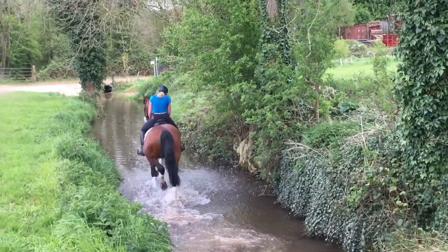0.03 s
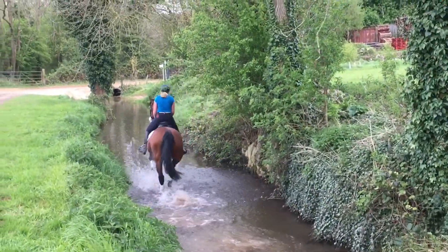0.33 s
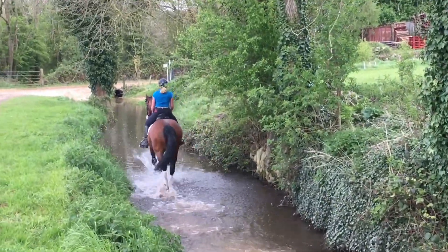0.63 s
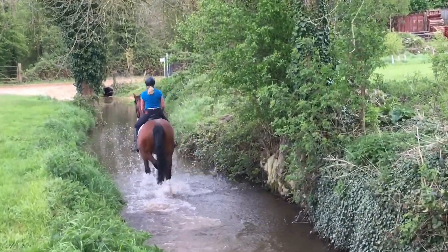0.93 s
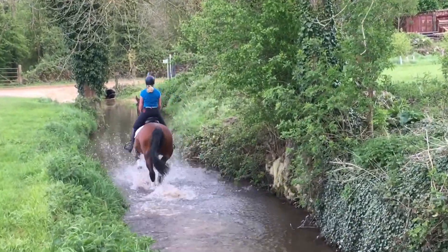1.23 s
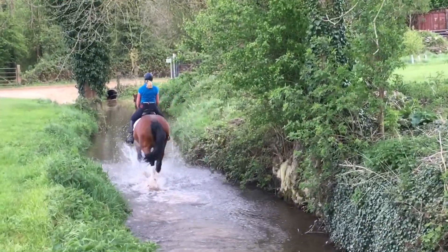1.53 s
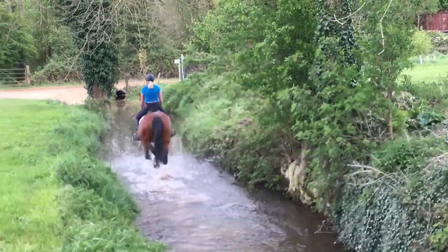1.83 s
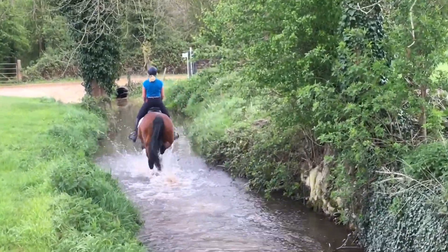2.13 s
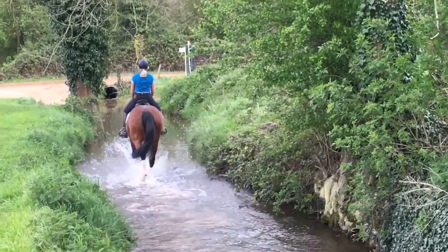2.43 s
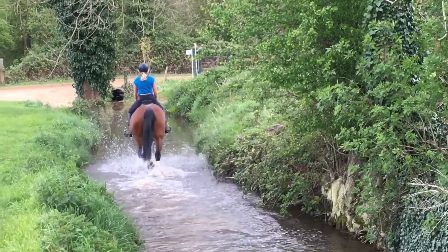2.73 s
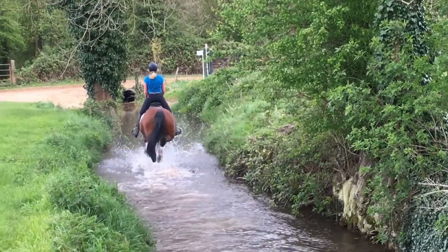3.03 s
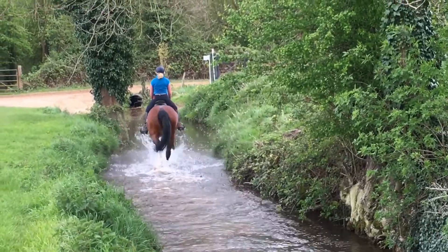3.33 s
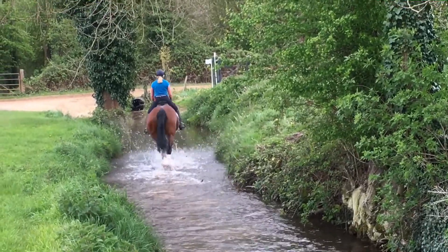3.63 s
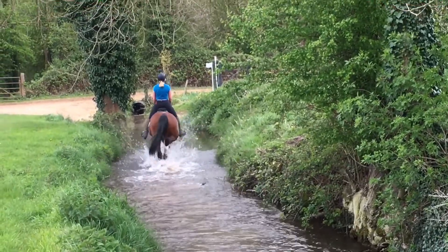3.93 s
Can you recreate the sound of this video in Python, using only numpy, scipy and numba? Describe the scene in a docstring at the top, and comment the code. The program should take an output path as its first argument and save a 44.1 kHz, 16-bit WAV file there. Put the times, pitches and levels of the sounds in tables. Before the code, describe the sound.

Rhythmic splashes of a horse trotting along a stream, with gusty wind and faint chirps.

```python
"""A horse trotting up a stream

A horse trots away through shallow water. Each stride kicks up a sheet of spray, then the hooves
plunge in with a gulp of bubbles. The churned water fizzes between strides and dulls with distance.
Gusts rumble and thump on the microphone, and a small bird twitters in the hedge."""
import sys
import numpy as np
from scipy import signal
from scipy.fft import rfft, irfft
from scipy.io import wavfile
from scipy.ndimage import uniform_filter1d, map_coordinates
from numba import njit

SR = 44100
rng = np.random.default_rng(int(sys.argv[2]) if len(sys.argv) > 2 else 0)


def digitize_waveform(pressure):
    """Quantize a signal to 16-bit integers and store it at the path in sys.argv[1].

    Rows of a 2-D input are taken as channels; values are limited to [-1, 1].
    """
    field = np.atleast_2d(pressure).T
    bounded = np.clip(field, -1, 1)
    quanta = np.round(bounded * 32767).astype(np.int16)
    wavfile.write(sys.argv[1], SR, quanta)


N = 176400
TIME_S, FREQ_HZ = np.arange(N) / SR, np.fft.rfftfreq(N, 1 / SR)


def gain(db):
    """Turn decibels into a number to multiply by."""
    return 10 ** (np.asarray(db) / 20)


def unit(sound):
    """Scale a sound to a typical size (rms) of 1."""
    return sound / (sound.std() + 1e-12)


def curve(rows, column=1):
    """Join one column of a table by straight lines over time."""
    rows = np.array(rows)
    return np.interp(TIME_S, rows[:, 0], rows[:, column])


def colour(sound, tone):
    """Turn some pitches up and others down, then scale to size 1."""
    hz, db = np.array(tone).T
    boost_db = np.interp(np.log(FREQ_HZ + 1), np.log(hz), db)
    return unit(irfft(rfft(sound) * gain(boost_db), N))


def swell(peak_s, rise_s, fade_s):
    """A loudness shape that climbs to a peak and dies away."""
    t = TIME_S - peak_s
    return np.exp(-(np.minimum(t, 0) / rise_s) ** 2 - np.maximum(t, 0) / fade_s)


def burst(sound, shape):
    """Cut a burst from a steady sound, with a size of about 1 at its peak."""
    return sound * shape * np.linalg.norm(shape) / np.linalg.norm(sound * shape)


def wander(per_s):
    """Drift from one random value to the next, typically by about 1."""
    values = rng.standard_normal(1024)
    return unit(map_coordinates(values, [TIME_S * per_s], order=1, mode="wrap"))


@njit
def ring(start_s, hz, cycles, size, glide):
    """Each bubble rings as a dying tone whose pitch rises."""
    out = np.zeros(N)
    for k in range(len(start_s)):
        length, phase = int(cycles[k] * SR / hz[k]), 0.
        for i in range(length):
            j = int(start_s[k] * SR) + i
            phase += 2 * np.pi * hz[k] * (1 + glide * i / length) / SR
            if 0 <= j < N:
                out[j] += size[k] * np.exp(-5 * i / length) * np.sin(phase)
    return out


def bubbles(per_s, low_hz, high_hz, cycles, spread_db):
    """A steady cloud of bubbles, a few much louder than the rest."""
    when, pitch, life, chance = rng.random((60000, 4))[:int(per_s * N / SR)].T.copy()
    hz = low_hz * (high_hz / low_hz) ** pitch
    size = gain(-spread_db * np.log(chance + 0.01))
    return unit(ring(when * N / SR, hz, cycles * (.5 + life), size, glide=0.11))


def drops(spread_db, per_s=5500):
    """Falling drops tick, over a steady hiss of tiny splashes."""
    chance, size = rng.random((2, N))
    hits = (chance < per_s / SR) * rng.choice([-1, 1], N)
    patter = hits * gain(-spread_db * np.log(size + 0.002))
    return unit(patter) + rng.standard_normal(N) * gain(3.5)


def flurries(sound, depth_db=1.23, per_s=55):
    """Drops of different sizes come in separate flurries, so each octave wavers on its own."""
    octave = np.log2(np.clip(FREQ_HZ, 1000, 16000) / 1000)
    bands = (irfft(rfft(sound) * np.maximum(1 - abs(octave - k), 0), N) for k in range(5))
    return sum(band * gain(depth_db * wander(per_s)) for band in bands)


# How loud the churned water is: time_s, babble_db, fizz_db
CHURN = [(0, -47, -46), (.17, -47.5, -41.5), (.37, -47, -47), (.9, -47, -46.5), (1.15, -43.5, -46),
         (1.47, -49.5, -49.5), (1.8, -50, -48), (2.08, -45, -49.5), (2.22, -51, -54.5), (2.44, -47, -48.5),
         (2.68, -50, -50.5), (2.9, -49.5, -46), (3.14, -53, -51), (3.38, -47.5, -48), (3.63, -53, -53),
         (3.85, -51.5, -48.5), (4, -49.5, -53)]
# Tone of the babble, the nearby fizz and the distant fizz: pitch_hz, boost_db
BABBLE_TONE = [(150, -33), (280, 8.5), (420, -18.5), (650, 0), (900, -3.5), (1300, 1), (1800, -8.5),
               (2300, -8.5), (3200, -13.5), (6000, -49)]
NEAR_FIZZ_TONE = [(1500, 4), (2600, 0), (3200, 4), (4100, 1.5), (4900, -3.5), (5800, 1.5), (7800, -2),
                  (9500, 1.5), (10800, -0.5), (12500, 2.5), (15500, -3)]
FAR_FIZZ_TONE = [(1500, 8), (2500, 2), (3400, -8.5), (4100, -0.5), (4900, -4.5), (5600, 2), (6600, 2),
                 (8200, -5.5), (10000, -7.5), (11800, -2), (15500, -11)]


def churned_water(far_from_s=2.24, far_by_s=2.8):
    """Big bubbles babble; drops and tiny bubbles fizz, duller as the horse draws away."""
    big = bubbles(4000, 200, 4810, cycles=12.3, spread_db=3)
    babble = colour(np.diff(big, prepend=0), BABBLE_TONE)  # diff brightens a sound
    babble *= gain(curve(CHURN, 1) + wander(40))
    patter = drops(spread_db=3.5)
    tiny = bubbles(1500, 2277, 13100, cycles=53, spread_db=3.5)
    fizz = patter + gain(-5) * unit(np.diff(tiny, prepend=0))
    far = np.clip((TIME_S - far_from_s) / (far_by_s - far_from_s), 0, 1)
    fizz = (1 - far) * colour(fizz, NEAR_FIZZ_TONE) + far * colour(fizz, FAR_FIZZ_TONE)
    return babble + flurries(fizz) * gain(curve(CHURN, 2))


# Strength of the gusts: time_s, level_db
GUSTS = [(0.0, -39), (0.15, -51), (0.19, -29), (0.37, -40.5), (0.43, -26), (0.5, -33), (0.54, -36.5),
         (0.75, -34.5), (1.0, -38.5), (1.06, -24), (1.1, -36), (1.14, -28), (1.34, -22.5), (1.49, -35.5),
         (1.6, -25.5), (1.64, -47), (1.7, -28), (1.8, -34.5), (1.9, -23.5), (1.95, -30), (1.99, -19),
         (2.15, -40), (2.31, -40.5), (2.34, -33), (2.42, -49), (2.46, -30), (2.53, -47), (2.57, -31.5),
         (2.63, -41.5), (2.83, -36), (2.94, -45), (3.11, -22), (3.22, -41), (3.26, -24.5), (3.32, -23.5),
         (3.43, -30), (3.61, -26), (3.7, -33), (3.75, -21), (3.8, -36), (3.83, -16.5), (3.88, -33),
         (3.9, -22.5), (4.0, -47)]
# Tone of the wind's rumble: pitch_hz, boost_db
WIND_TONE = [(18, -22), (30, -32), (42, -1.5), (58, 3.5), (85, 0), (130, -7), (200, -14), (300, -29),
             (450, -33.5), (900, -72)]


def wind(brighten=0.18):
    """Swirling air rumbles on the microphone, louder and brighter in the gusts."""
    gust_db = curve(GUSTS)
    rumble = colour(rng.standard_normal(N), WIND_TONE)
    rumble /= np.sqrt(uniform_filter1d(rumble ** 2, SR // 32) + 0.17)  # even out chance swells
    bass = signal.sosfiltfilt(signal.butter(2, 110, fs=SR, output="sos"), rumble)
    upper = (rumble - bass) * gain(brighten * (gust_db - gust_db.max()))
    return gain(gust_db) * (bass + upper)


# The bird's notes: start_s, length_s, from_hz, to_hz, relative_level_db
BIRD_NOTES = [(.005, 0.032, 4450, 4250, -48.5), (0.47, .03, 5240, 4400, -55), (.578, 0.02, 3770, 4150, -48),
              (.662, 0.032, 6080, 4840, -48), (0.692, 0.021, 4900, 4120, -43.5),
              (.795, .025, 4800, 4700, -51), (1.055, 0.02, 4200, 4450, -45), (1.17, .018, 4500, 4000, -50),
              (1.334, .014, 5470, 4600, -49), (1.357, 0.0177, 4900, 3940, -47),
              (1.381, 0.025, 4660, 4900, -50), (1.45, 0.046, 4680, 4550, -51),
              (1.797, 0.028, 4450, 4650, -52), (1.83, 0.032, 5300, 4400, -52)]


def bird():
    """A small bird sings short, thin, sliding notes that waver in pitch and loudness."""
    out, waver = 0, 1 + 0.0243 * wander(350)
    for start_s, length_s, from_hz, to_hz, db in BIRD_NOTES:
        progress = np.clip((TIME_S - start_s) / length_s, 0, 1)
        hz = (from_hz + (to_hz - from_hz) * progress) * waver
        out += gain(db) * np.sin(np.pi * progress) * np.sin(2 * np.pi * np.cumsum(hz) / SR)
    return out * gain(wander(160) - 0.5)


# Sheets of spray: peak_s, level_db, rise_s, fade_s
SPRAY_SHEETS = [(.03, -44.5, 0.033, 0.085), (.20, -40, 0.02, 0.048), (.268, -38, 0.017, 0.014),
                (.66, -45, 0.021, 0.072), (.772, -54, 0.021, 0.013), (1.10, -39, 0.03, 0.039),
                (1.56, -44, 0.06, 0.092), (1.66, -53, .02, .045), (2.05, -54, 0.039, 0.046),
                (2.55, -49, .1, 0.071), (2.94, -50, 0.048, 0.073), (3.015, -50.5, 0.024, 0.029),
                (3.42, -53, 0.047, 0.077), (3.83, -52.5, 0.045, .04)]
# Tone of the spray: pitch_hz, boost_db
SPRAY_TONE = [(530, -11), (900, 6), (1090, 1), (2070, -0.5), (2310, -8.5), (3260, -1.5), (4880, -9.5),
              (5500, -6), (8050, -10), (8750, -5.5), (15500, -12)]


def spray():
    """The legs kick up sheets of drops with each stride."""
    power = sum((gain(db) * swell(peak_s, rise_s, fade_s)) ** 2
                for peak_s, db, rise_s, fade_s in SPRAY_SHEETS)
    return np.sqrt(power) * colour(drops(spread_db=2), SPRAY_TONE)


# Hooves plunging in: peak_s, slosh_db, pitch_hz, rise_s, fade_s, gulp_db
HOOF_PLUNGES = [(0.134, -47, 900, .008, 0.053, -41.5), (0.296, -38, 1200, .03, 0.058, -38.5),
                (.655, -43, 1180, 0.0065, 0.12, -65), (.777, -32, 836, .016, 0.016, -29.5),
                (.99, -44, 960, 0.012, 0.011, -52), (1.105, -51, 1500, 0.034, 0.066, -47),
                (1.225, -41, 1140, .035, 0.028, -41), (1.658, -37.5, 1010, 0.021, 0.056, -38.5),
                (2.112, -44, 1330, 0.026, 0.043, -45.5), (2.475, -42.5, 1120, 0.0046, 0.021, -50),
                (2.568, -37, 970, 0.017, 0.023, -34.5), (2.599, -48, 900, 0.0067, 0.015, -33.5),
                (2.94, -46, 1200, 0.022, 0.033, -47), (3.013, -38, 1080, 0.02, 0.053, -37.5),
                (3.46, -39.5, 1090, 0.02, .025, -39), (3.9, -44.5, 955, 0.042, 0.085, -42)]
# Tone of the air pocket's gulp: pitch_hz, boost_db
GULP_TONE = [(70, -61), (140, -4), (280, 3), (350, 7.5), (450, -44), (600, 3), (900, -26), (2000, -50)]


def hooves(width_octaves=0.91, gulp_lag_s=.004):
    """Each hoof drags under a cloud of bubbles, and its air pocket closes with a gulp."""
    cloud = rfft(bubbles(6000, 264, 7300, cycles=9.7, spread_db=6))
    gulp = colour(bubbles(1200, 139, 766, cycles=4.4, spread_db=2), GULP_TONE)
    out = 0
    for peak_s, slosh_db, hz, rise_s, fade_s, gulp_db in HOOF_PLUNGES:
        octaves_away = np.log2((FREQ_HZ + 1) / hz)
        slosh = irfft(cloud / (1 + (octaves_away / width_octaves) ** 2), N)
        out += gain(slosh_db) * burst(slosh, swell(peak_s, rise_s, fade_s))
        out += gain(gulp_db) * burst(gulp, swell(peak_s + gulp_lag_s, rise_s, fade_s))
    return out


# Swirls of air striking the microphone: time_s, level_db, rough_pitch_hz, flutter_s
THUMPS = [(0.193, -28.5, 110, .012), (0.432, -24, 90, 0.017), (.555, -22, 80, 0.058),
          (0.598, -18.5, 103, 0.031), (.688, -19.5, 97, 0.018), (0.738, -16.5, 111, 0.0061),
          (.792, -23, 99, 0.014), (1.054, -21, 122, 0.016), (1.218, -23, 99, 0.023),
          (1.243, -26, 160, 0.0092), (1.329, -18.5, 120, 0.0091), (1.336, -20, 570, 0.0056),
          (1.348, -18.5, 247, 0.025), (1.361, -22.5, 306, .012), (1.423, -15, 246, 0.0033),
          (1.595, -17, 88.5, 0.011), (1.895, -14, 142, 0.021), (1.985, -7, 240, 0.0034),
          (1.995, -16, 184, 0.0067), (2.019, -16.5, 151, 0.0076), (2.355, -30, 60, 0.0088),
          (3.1, -16, 68, 0.064), (3.273, -8.5, 280, 0.0052), (3.285, -14.5, 250, 0.0074),
          (3.308, -6.5, 176, .014), (3.347, -13.5, 139, 0.0048), (3.549, -13.5, 244, 0.0088),
          (3.593, -9.5, 190, 0.0058), (3.657, -19, 90, 0.019), (3.748, -13, 198, 0.0027),
          (3.825, -15.5, 155, 0.0069), (3.854, -13, 237, 0.0074), (3.898, -12.5, 145, 0.0084)]


def wind_thumps(flutter_db=-12):
    """Each swirl of air gives one sharp swing of pressure, with a brief flutter behind it."""
    out, noise = 0, rfft(rng.standard_normal(N))
    for time_s, db, hz, flutter_s in THUMPS:
        pulse = 1 / (1 - .5j * np.pi * hz * (TIME_S - time_s)) ** 4
        swing = np.real(np.exp(2j * np.pi * rng.random()) * pulse)  # a random mix of push and pull
        rumble = irfft(noise * FREQ_HZ ** 2 / (1 + (FREQ_HZ / hz) ** 6.03), N)  # noise near the pitch
        flutter = burst(rumble, swell(time_s + flutter_s / 2, flutter_s, flutter_s))
        out += gain(db) * (swing + gain(flutter_db) * flutter)
    return out


# Single drops landing: time_s, level_db
DROP_TICKS = [(1.917, -44), (1.958, -45), (2.556, -47), (3.183, -48)]
# Tone of a tick: pitch_hz, boost_db
TICK_TONE = [(5000, -30), (9000, -9), (12000, 4), (15500, -2)]


def single_drops():
    """Single drops slap the surface with a crisp tick."""
    loudness = sum(gain(db) * swell(time_s, rise_s=.001, fade_s=.0037) for time_s, db in DROP_TICKS)
    return loudness * colour(rng.standard_normal(N), TICK_TONE)


def outdoors(sound, echo_db, echo_s=0.2):
    """Banks and leaves scatter back a short echo, which fades by 60 dB in echo_s."""
    t = np.arange(SR // 2) / SR
    tail = rng.standard_normal(len(t)) * np.exp(-np.log(1000) * t / echo_s) * (t > .006)
    return sound + gain(echo_db) * signal.fftconvolve(sound, tail / np.linalg.norm(tail))[:N]


def scene():
    """Water and bird echo among the banks; the wind is right at the microphone."""
    water = hooves() + spray() + single_drops() + churned_water()
    mix = outdoors(water, echo_db=-13) + outdoors(bird(), echo_db=-7) + wind() + wind_thumps()
    return mix[None]


def record(dry):
    """Cut away the deepest bass and the highest treble."""
    sound = signal.sosfilt(signal.butter(2, 28, "high", fs=SR, output="sos"), dry)
    return signal.sosfilt(signal.ellip(10, .2, 80, 15600, fs=SR, output="sos"), sound)


dry = scene()
out = record(dry)
digitize_waveform(out)
```